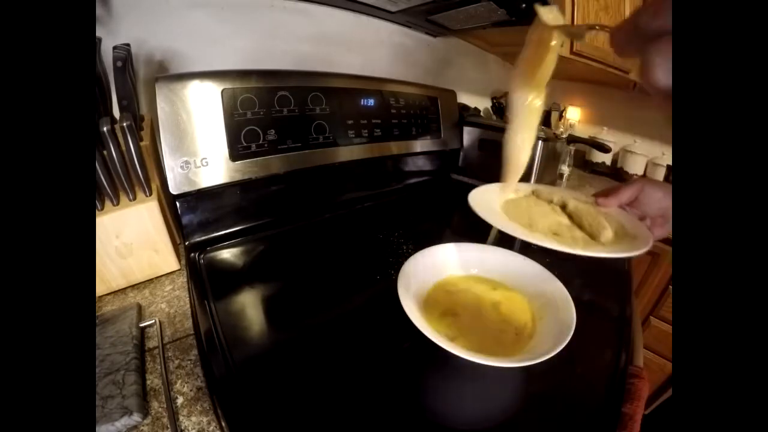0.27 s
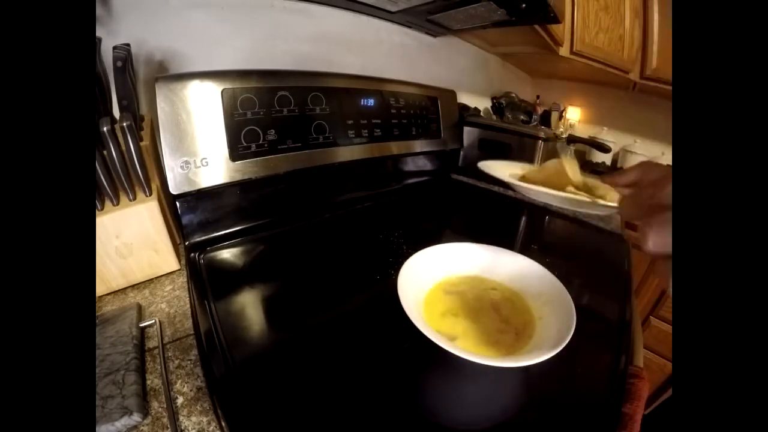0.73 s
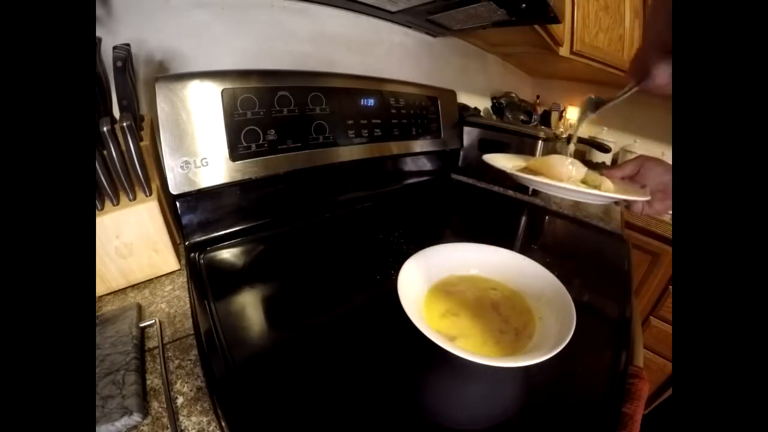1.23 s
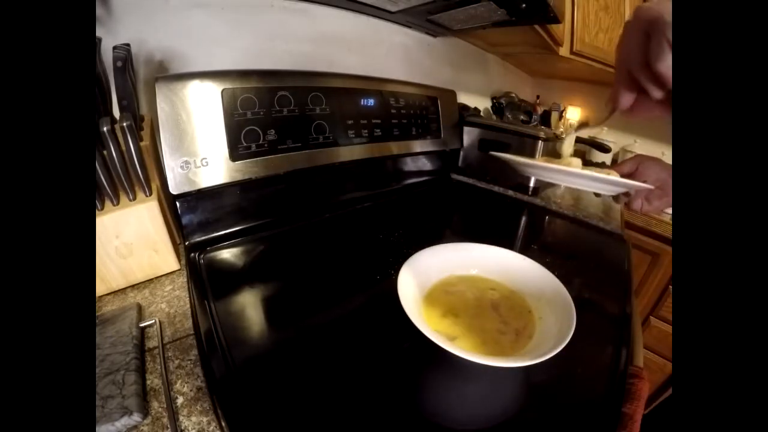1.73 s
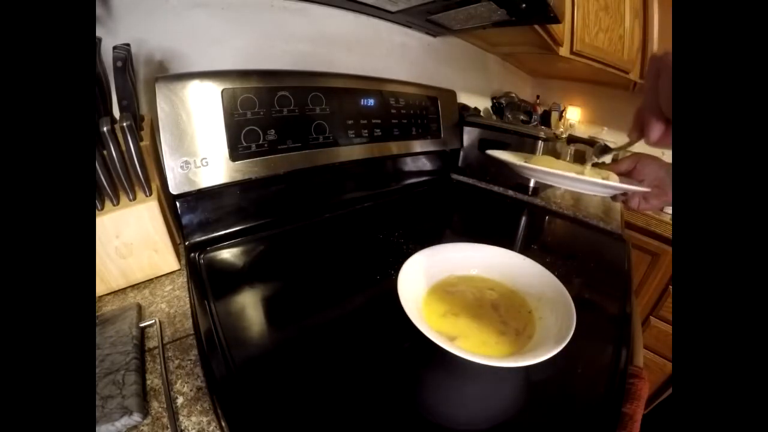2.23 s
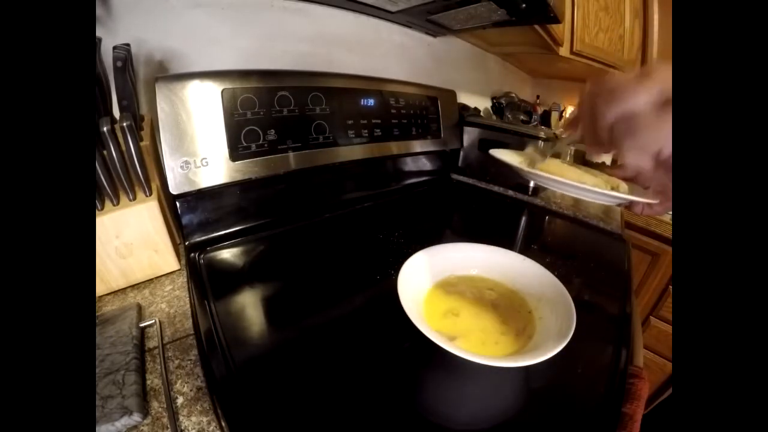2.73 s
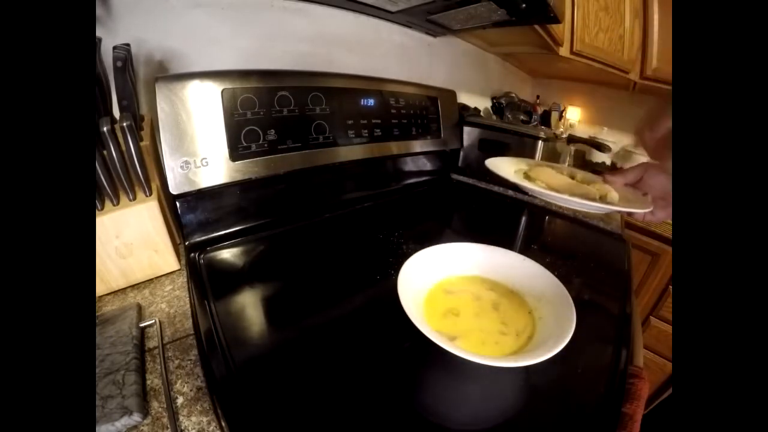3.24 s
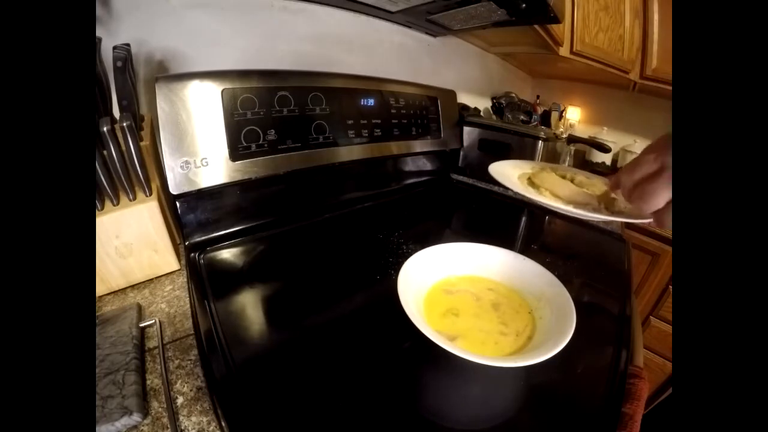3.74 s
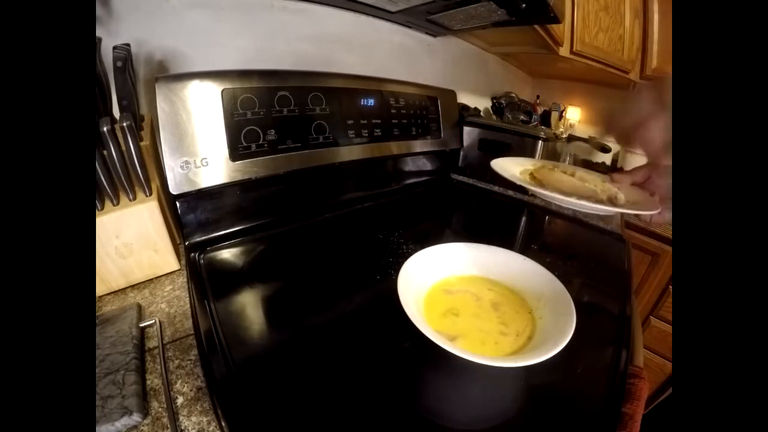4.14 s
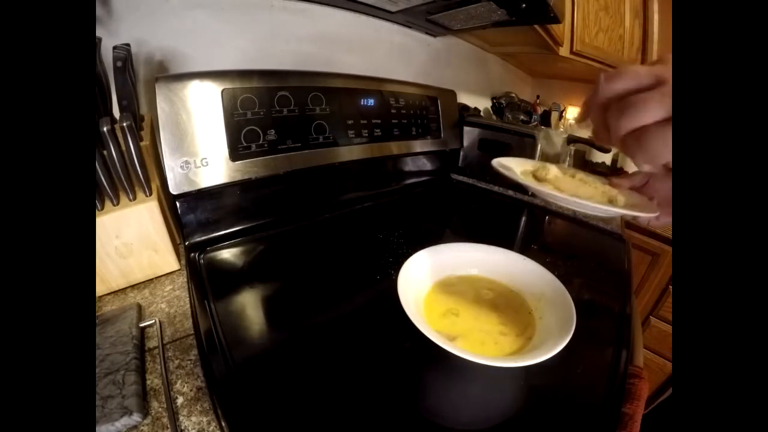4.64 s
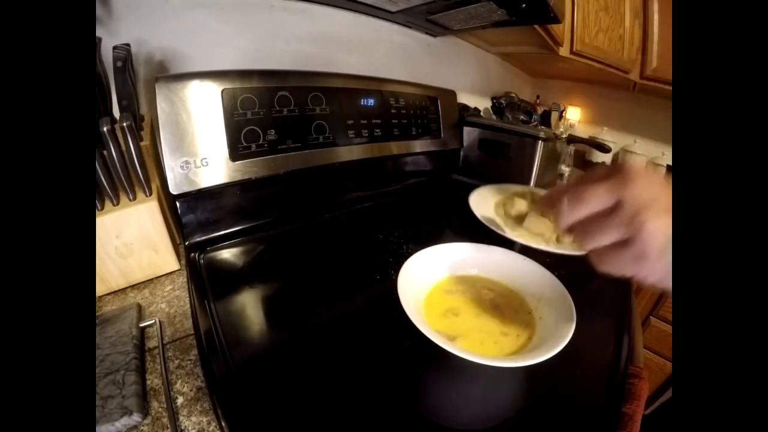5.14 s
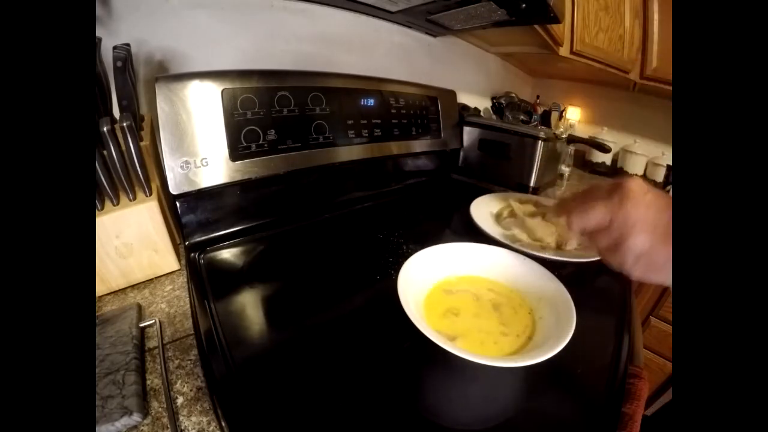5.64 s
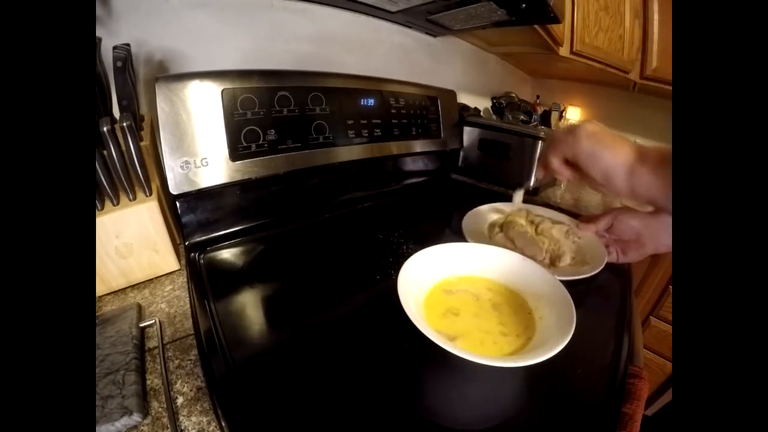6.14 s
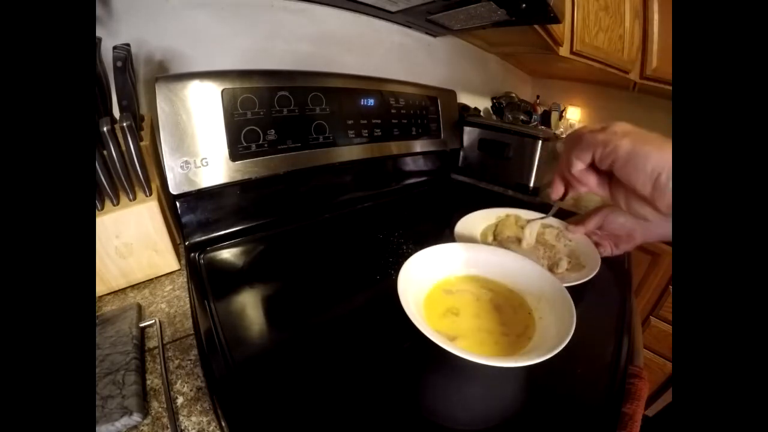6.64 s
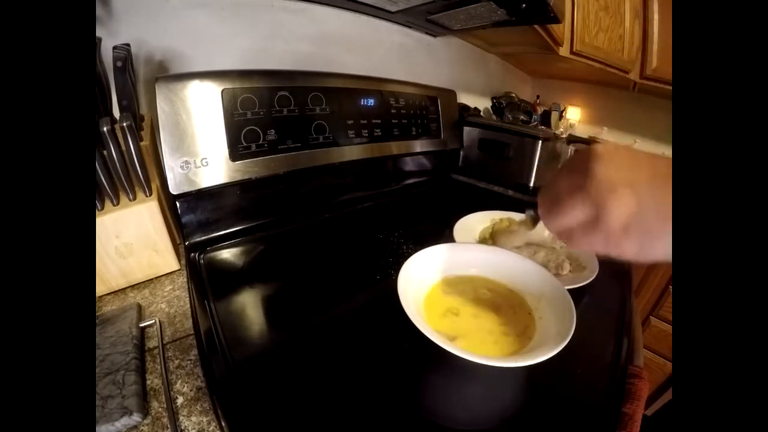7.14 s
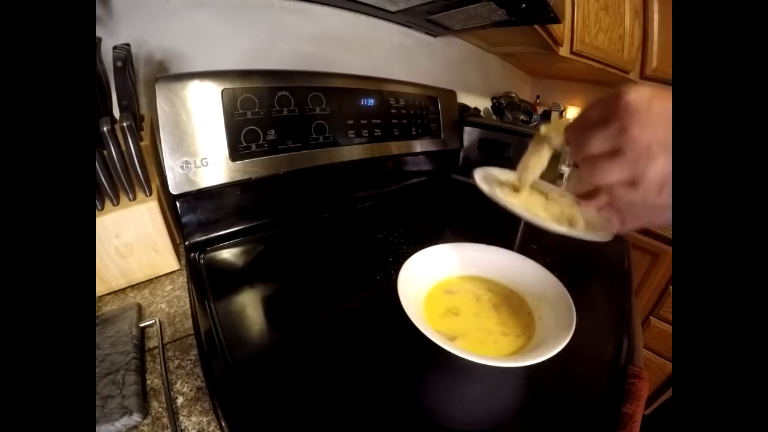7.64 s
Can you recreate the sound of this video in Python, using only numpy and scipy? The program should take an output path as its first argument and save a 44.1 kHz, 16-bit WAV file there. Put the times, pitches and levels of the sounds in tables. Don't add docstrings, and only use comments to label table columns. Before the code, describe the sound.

A steady low mains hum and faint airy hiss fill a small, hard-walled kitchen. At about 0.7 s a fork brushes a hand-held ceramic plate, then from 0.8 to 1.05 s a rapid bright cluster of clinks and scrapes, damped and short, trailing into a faint slide until 1.6 s. A single sharp, glinting tap comes at 2.0 s, with a small scrape at 2.2 s, and another hard clink at 2.8 s that rings slightly longer. Soft ticks and gritty slides run from 3.5 to 4 s, then near quiet. Light taps return at 5.2 to 5.7 s. At 6.5 s the plate slams onto the glass cooktop, a very loud close crash with a deep boom. It grinds and skids, then from 7.0 to 7.45 s is dragged with fast knocks, rumble and tiny high squeaks, fading into hum with faint scrapes near 7.7 s.

```python
import sys
import numpy as np
from scipy import signal
from scipy.fft import rfft, irfft, next_fast_len
from scipy.io import wavfile
from scipy.ndimage import uniform_filter1d

SR = 44100
rng = np.random.default_rng(int(sys.argv[2]) if len(sys.argv) > 2 else 0)


def master(y):
    cut = np.clip(np.atleast_2d(y).T, -1, 1)
    pcm = np.round(cut * 32767)
    wavfile.write(sys.argv[1], SR, pcm.astype(np.int16))


def gain_from_db(level_db):
    decades = np.asarray(level_db, float) / 20
    return 10 ** decades


N = 347949
T = np.arange(N) / SR

# (frequency [Hz], level [dB rms])
HUM_LINES = [(60.057, -35.7), (-120.1, -48.7), (240.2, -76), (540, -76), (720.6, -77), (785, -77),
             (1020.9, -74)]
# (frequency [Hz], density [dB per Hz])
AIR_COLOUR = [(20, -71.5), (40, -69.5), (90, -72.5), (150, -80), (300, -85.5), (550, -89.5), (1000, -94),
              (1400, -95.5), (2200, -98.5), (5000, -102), (9000, -103), (13000, -105), (14500, -103.5)]
# (frequency [Hz], side minus mid [dB])
AIR_WIDTH = [(60, -11), (110, -13), (200, -7.5), (380, -7.5), (700, -6.5), (1290, -5), (2380, -3),
             (4400, -0.5), (8120, 0), (15000, -0.5)]

# (frequency [Hz], level [dB], t60 [s])
PLATE_MODES = [(315, -12, 0.062), (549.4, -6.5, 0.07), (721.1, -4.5, .1), (931.5, -8.5, 0.07),
               (1141, -10, .04), (1386.6, -9, 0.028), (1583.3, -6, 0.04), (1849, -13.5, 0.038),
               (2134, -15, 0.027), (2408.3, -5, 0.051), (2581, -15, 0.077), (2797, -15.5, 0.046),
               (3348, -2, 0.066), (3590, -18.5, 0.025), (4398, -4.5, 0.048), (4780, -43.5, 0.054),
               (5278, -11.5, 0.05), (5474, -2.5, 0.045), (6063, -10, 0.032), (6543, -7, 0.04),
               (6973, -12, 0.049), (7350, -21, .05)]
# (frequency [Hz], level [dB], t60 [s])
RIM_MODES = [(1514, -21.5, 0.13), (1626, -25, .25), (2437.3, -19, 0.11), (2458.3, -21, 0.22),
             (3294, -18, 0.2), (3360, -17.5, 0.28), (4360, -27, 0.15), (4400, -24, 0.16),
             (5206, -23.5, .25), (5438, -21.5, 0.18)]
# (frequency [Hz], level [dB], t60 [s])
TINE_MODES = [(7790, -0.5, 0.1), (8055, 4, 0.045), (9170, -3, 0.067), (10000, -1.5, 0.033),
              (10720, 1.5, 0.04), (11430, 3.5, 0.032), (11900, -8, 0.037), (13504, -6, .05)]
GROUP_BORDERS_HZ = [1200, 2000, 3000, 3700, 4700, 7500]
GROUP_MIDDLES_HZ = [700, 1550, 2450, 3350, 4400, 6000, 9500]
GROUP_ANSWER_DB = [0.6, 0.29, -2.5, -0.67, -0.12]
# (time [s], level [dB], favoured pitch [octaves re 3 kHz], fall-off [dB per octave], tine glint [dB])
FORK_TAPS = [(0.6644, -60, -0.26, -10, 7.5), (0.8150, -28, 0.47, 3, 1), (0.850, -22, -.8, 14.5, -6),
             (0.8753, -18, 0.21, 4.5, -5.5), (0.8846, -13, -0.57, 6, -2), (0.9025, -11, 0.11, 9, -3.5),
             (0.9114, -19, -0.15, 18, 0.13), (0.947, -17, -.3, 14, -1), (1.0335, -26.5, 1.12, 16, 4.5),
             (1.0474, -29.5, .8, 21, 3.1), (1.9961, -12.5, 0.88, 16, 10.5), (2.797, -13, 0.168, -11.5, 6),
             (2.8017, -9, -.3, 12.5, -0.1), (3.4624, -43, 0.29, -9.5, 2.5), (3.5139, -45, 0.23, 12, 0.54),
             (3.552, -40, 0.13, 6.5, 0.14), (3.5964, -36, 0.29, 6.5, -0.04),
             (3.7222, -28, -0.63, 11.5, -1.6), (3.7541, -48, 0.24, -9.5, -0.35),
             (3.8023, -40, -0.66, 11, -0.4), (5.2435, -29, 0.19, 8.5, -0.2), (5.2544, -37, 0.21, 22, -0.2),
             (5.3741, -35, .16, 5, .1), (5.4174, -46, .45, 4.5, 1.1), (5.4461, -30.5, 0.23, 2.5, 8),
             (5.5397, -42, 0.33, -2, 1), (5.7046, -47, -0.38, 12, -0.9), (2.0003, -16.5, 0.77, 12, 8),
             (5.4403, -38, 0.52, 4, 4.5), (.894, -18.5, -0.83, 11, -2), (.964, -26, 0.39, 12, 0.97),
             (5.515, -47.5, -0.25, 7.5, 1), (5.717, -52.5, 0.56, 2.5, -0.82)]
# (time [s], frequency
# [Hz], level [dB], t60 [s])
SINGLE_MODES = [(.062, 850, -38.5, 0.0314), (1.17, 4800, -52.5, 0.092), (1.232, 4870, -46.5, 0.167),
                (1.1, 6770, -49, 0.233), (1.232, 8800, -50.5, 0.152), (1.232, 13200, -54, .1),
                (7.4, 6100, -47.5, .08), (2.798, 1545, -35, 0.55), (2.797, 1588, -12.5, .065),
                (2.797, 5455, -14, .07), (1.998, 700, -30.5, .09), (.903, 2400, -17, .09),
                (7.32, 190, -26, 0.38), (5.245, 1600, -36.5, .08), (3.6, 3800, -45.5, 0.087),
                (6.508, 560, -19, .08), (1.997, 4357, -13, .085), (.852, 1320, -28, .12),
                (.884, 1400, -22.5, 0.103), (.884, 1950, -26, .08), (.877, 3780, -24.5, 0.102),
                (.904, 3820, -22.5, 0.088), (.904, 4450, -19.5, 0.079), (5.245, 4350, -36, .06),
                (6.89, 180, -25, 0.166), (2.798, 2428, -33.5, .5), (3.463, 1320, -33.5, 0.058),
                (3.516, 720, -42, 0.126), (1.999, 3365, -31.5, 0.427), (1.998, 10700, -37, 0.054),
                (1.997, 6500, -21.5, .06), (2.797, 970, -19.5, .04), (2.8, 820, -37.5, 0.27),
                (5.376, 3350, -41, 0.121), (5.376, 1650, -42.5, .06), (7.39, 2430, -39, .15),
                (1.997, 1450, -31.5, .04), (1.998, 400, -36, 0.087), (.818, 720, -37, .15),
                (1.998, 7790, -36, 0.135), (5.446, 9100, -38, 0.042), (5.45, 4230, -44, 0.155),
                (5.47, 2520, -53.5, 0.54), (1.034, 6500, -29.5, 0.105), (2.223, 4180, -39, 0.0366),
                (3.33, 4950, -52, 0.044), (6.22, 3780, -47.5, 0.052),
                (1.997, 5449, -22, .08), (1.997, 3478, -19, 0.067), (1.998, 6180, -26.5, 0.077),
                  (1.998, 4165, -30, 0.061), (1.998, 3050, -23, 0.044), (1.999, 5565, -32.5, 0.19),
                  (1.999, 5770, -38, 0.27), (1.998, 1330, -33.5, 0.071), (2.797, 4380, -19.5, .14),
                  (2.797, 3386, -22, 0.114), (2.798, 5305, -21, .06), (2.815, 5474, -31, .36),
                  (2.815, 3370, -33, .3), (2.8, 2610, -30.5, 0.136), (2.8, 1400, -32, 0.246),
                  (2.8, 1338, -33, 0.145), (2.8, 7940, -38, 0.154), (2.8, 9708, -44, .12),
                  (2.8, 11490, -46, .12), (2.8, 600.3, -36, .2), (2.797, 6950, -21, .07),
                  (2.8, 7040, -36, .3), (2.8, 6110, -34, .22), (2.797, 2430, -18, .06),
                  (2.82, 1626, -35, .38), (1.998, 6640, -24, .06), (1.998, 6410, -24, .05),
                  (2.0, 6500, -40, .4), (5.447, 5300, -40, .1), (5.447, 6200, -42, .1),
                  (5.46, 5300, -54, .5), (.875, 5500, -28, .1), (.904, 5500, -28, .1),
                  (.875, 6650, -28, .12), (.885, 6200, -31, .06), (.946, 6700, -35, .08),
                  (.953, 5450, -35, .15), (.96, 4450, -34, .1), (.885, 750, -31, .15),
                  (5.447, 1594, -38, .1), (5.447, 2456, -38, 0.083), (5.447, 3914, -38, 0.062),
                  (5.253, 3360, -37, 0.06), (5.54, 4230, -45, .07), (5.418, 1687, -45.5, 0.068),
                  (5.418, 4470, -48.5, 0.084), (.665, 1561, -46, 0.188), (.89, 1693, -24.5, 0.068),
                  (.905, 1497, -24, 0.061), (.905, 3397, -22.5, 0.093)]
# (time [s], level [dB], hold [s], fade [s per 20 dB], low-mode ring [dB])
FORK_SCRAPES = [(0.664, -53.5, 0.0285, 0.21, -6.5), (0.858, -38, 0.017, 0.0874, -5),
                (.9, -29, 0, 0.0635, -8), (1.044, -41.5, 0, 0.0633, -24.5),
                (1.141, -60, 0.457, 0.02, -23.5), (1.899, -64, 0.072, 0.16, -11),
                (2.171, -55.5, 0.064, 0.0772, -13), (2.3, -70, 0.14, 0.28, -8),
                (3.501, -51.5, .04, 0.0435, -9), (3.6, -57, 0.141, 0.23, -8),
                (3.748, -55, .04, 0.0673, 3.5), (3.84, -58, 0.174, 0.02, -21),
                (4.42, -66.5, 0.338, 0.12, -10.5), (5.385, -46.5, 0.006, 0.0173, -12),
                (5.456, -41.5, 0, 0.0076, -11), (5.48, -55, 0.017, 0.2732, -4.5),
                (6.12, -69, 0.041, 0.4, -7), (6.222, -59.5, 0, 0.31, -12), (6.436, -60, 0.0051, .1, -9.5),
                (7.646, -55.5, 0.00077, 0.15, -11.5), (7.792, -54.5, 0.0016, 0.22, -6)]
# (frequency [Hz], level [dB])
GLAZE_COLOUR = [(1000, -43), (2500, 15.5), (4500, 21), (6200, 14), (7500, 2), (14000, -29)]

# (frequency [Hz], t60 [s])
ROOM_DECAY = [(200, 0.7), (1500, 0.47), (4000, 0.44), (8000, 0.4), (14000, 0.33)]

# (frequency [Hz], width [Hz], level [dB])
GLASS_MODES = [(87.7, 21, -1), (180.1, 18.6, 6.5), (313.9, 30, -3), (505, 35, -4), (600, 40, -3),
               (762.5, 70, -12), (890, 69, -6.5), (1103.6, 66, -8.5), (1320, 90, -12), (1749, 240, -9.5),
               (2140, 150, -4.5), (2435, 120, -5), (2800, 160, -9), (3374, 170, -13), (4600, 123, -24.5)]
# (frequency [Hz], level [dB])
GLASS_COLOUR = [(20, 7.5), (60, 3), (200, 5), (1000, -33.5), (3000, -11), (6000, -32), (9000, -65),
                (15000, -63)]
# (time [s], load [dB], brightness from speed [dB])
SETTLE_DRAG = [
    (6.25, -61, 1.47),
    (6.49, -57.5, 0.24),
    (6.56, -36, -0.16),
    (6.66, -32, 1),
    (6.755, -35.5, 3.5),
    (6.772, -45.5, 3.5),
    (6.89, -40, 6),
    (6.95, -50.5, -0.75),
    (7.02, -48, 0.8),
]
# (time [s], load [dB], brightness from speed [dB])
PULL_DRAG = [
    (7.09, -31, -.5),
    (7.23, -31, -3.5),
    (7.285, -40, -4),
    (7.33, -32, 2.5),
    (7.37, -32, 1.5),
    (7.45, -35, 4),
    (7.47, -43.5, -0.43),
    (7.53, -53, 0.12),
    (7.89, -59, -2),
]
# (time [s], level [dB], hardness [dB], favoured mode [Hz])
FOOT_KNOCKS = [(6.514, -7, 2, 873), (6.797, -38, 8.5, 543), (6.834, -40, 12, 3400),
               (6.845, -39.5, 7.5, 1058), (6.884, -29, 5, 2483), (7.037, -22, -1, 863),
               (7.048, -24.5, 3, 1097), (7.072, -20, 4, 614), (7.084, -13, .5, 1111),
               (7.1136, -11.5, 1, 538), (7.125, -22, -1.5, 547), (7.161, -17.5, 3, 871),
               (7.187, -14.5, -0.22, 505), (7.222, -14.5, 2.5, 905.7), (7.238, -23, -6, 313),
               (7.305, -30, 5.5, 2710), (7.314, -22, .1, 900), (7.326, -20, 0.03, 590),
               (7.415, -30, 3, 2434), (7.424, -34.5, 8, 3810), (6.6, -28, 2, 2697), (6.728, -39.5, 8, 2150),
               (6.752, -37, 5.5, 3300), (7.008, -41, -3, 580), (7.336, -23, 1, 1650),
               (7.445, -32.5, 6, 4090)]
# (frequency [Hz], level [dB], t60 [s])
BOOM_MODES = [(38, -17, 0.55), (88, -8, .22), (150.55, -14, 0.252), (183.6, -8, 0.149),
              (306.2, -10, 0.1217), (506.8, -15, .13), (610, -15, .1), (1129, -26, 0.25)]
# (frequency [Hz], density [dB per Hz])
SLAM_COLOUR = [(35, -34), (60, -3), (214, -9), (408, -25.5), (895, -11), (1240, -12), (1520, -8.5),
               (2260, -13.5), (3270, -14), (6380, -26), (15000, -39)]
# (band from [Hz], band to [Hz], t60 [s])
SLAM_DECAY = [(59.4, 290, 0.17), (295, 1080, 0.099), (1205, 5210, 0.0695), (3920, 7970, 0.0543),
              (7840, 13300, 0.0187)]
# (time [s], level [dB])
SQUEAKS = [
    (7.105, -39.5),
    (7.14, -53),
    (7.202, -43.5),
    (7.237, -44.5),
    (7.26, -48),
    (7.31, -48.5),
]

# (frequency [Hz], side minus mid [dB])
PORT_WIDTH = [(30, -8.5), (90, -17), (200, -23), (700, -27), (1500, -26), (3000, -17), (6000, -10),
              (10000, 0.5), (14000, -2)]
# (frequency [Hz], level [dB])
CREEP_COLOUR = [(6500, -34.5), (10000, -7.5), (14000, 0)]

CRACK_DB, CRACK_S, TINK_RISE_S = 1, 0.0052, .001
GRIP_S, GRIP_DB_PER_S = 3.5, 5
REACH_OCT, RIM_DB = 1.28, -10
CONTACT_MS, CONTACT_MS_PER_DB = 1.1, 0.0471
THUD_DB, GLINT_DB, ENDS_POWER = -19, -30, 0.698
STROKE_RISE_S, UPPER_RING_DB = 0.037, 1
ROOM_DB, ROOM_WIDTH, SWAY_S = -15.5, 0.1, .00007
KNOCK_T60_S, THUMP_DB, EDGE_DB, BOOM_DB = 0.0573, -2.5, -9, -3
NOTE_DB, NOTE_T60_S, JUDDER_DB = -2, 0.0524, 1.1
RUMBLE_DB, RUMBLE_POWER, DRAG_EDGE_DB, HISS_DB = -12, 0.599, -6, -27.5
SLAM_S, SLAM_DB = 6.5062, -1.5
SQUEAK_HZ, SQUEAK_FADE_S = 5154, 0.0205
TOP_HZ, FULL_SCALE = 15150, .93


def shape(x, points, turn=1):
    hz, db = np.transpose(points)
    size = next_fast_len(x.shape[-1])
    f = np.maximum(np.arange(size // 2 + 1) * SR / size, 1)
    gain = gain_from_db(np.interp(np.log(f), np.log(hz), db))
    return irfft(rfft(x, size) * turn * gain, size)[..., :x.shape[-1]]


def band_pass(x, lo_hz, hi_hz):
    return signal.sosfilt(signal.butter(2, [lo_hz, hi_hz], "band", fs=SR, output="sos"), x)


def band(x, lo_hz, hi_hz):
    y = band_pass(x, lo_hz, hi_hz)
    return y / np.std(y)


def ring(x, hz, width):
    return signal.lfilter(*signal.iirpeak(hz, hz / width, fs=SR), x)


def decay(t, t60):
    return 1000. ** (-t / t60)


def onset(t, rise_s):
    return 1 - np.exp(-t / rise_s)


def curve(rows):
    s, *columns = np.transpose(rows)
    times = np.r_[s[0] - .03, s, s[-1] + .03]
    return [gain_from_db(np.interp(T, times, np.r_[-120, c, -120])) for c in columns]


def stroke(s, db, hold_s, fade_s):
    t = T[::44]
    before = (s - t) / min(STROKE_RISE_S, fade_s)
    after = np.maximum(t - s - hold_s, 0) / fade_s
    return gain_from_db(db - 20 * np.maximum(before, after))


def grit(rate, spread_db):
    hit = rng.random(N) < rate / SR
    return hit * rng.choice([-1, 1], N) * gain_from_db(spread_db * rng.exponential(size=N))


def add(out, s, sound):
    i = int(s * SR)
    out[i:i + len(sound)] += sound[:N - i]


def background():
    hum = sum(np.sign(hz) * gain_from_db(db) * np.sqrt(2) * np.cos(2 * np.pi * hz * T) for hz, db in HUM_LINES)
    mid, side = shape(rng.standard_normal((2, N)), AIR_COLOUR) * np.sqrt(SR / 2)
    return hum, mid, shape(side, AIR_WIDTH)


def tap_groups(s, tap_db, octave, fall_db, tines_db):
    away = np.minimum(abs(np.log2(np.divide(GROUP_MIDDLES_HZ[1:-1], 3000)) - octave), REACH_OCT)
    ring_db = tap_db - fall_db * away
    ends_db = ENDS_POWER * ring_db.max() - .25 * abs(fall_db)
    thud_db = THUD_DB + ends_db - GRIP_DB_PER_S * max(s - GRIP_S, 0)
    return np.r_[thud_db, ring_db + GROUP_ANSWER_DB, GLINT_DB + ends_db + tines_db]


def taps():
    out, t = np.zeros(N), T[:SR // 4]
    hz, db, t60 = np.transpose(PLATE_MODES + RIM_MODES + TINE_MODES)[:, :, None]
    on_rim = np.repeat([0, 1, 0], [len(PLATE_MODES), len(RIM_MODES), len(TINE_MODES)])[:, None]
    wander = .008 * np.cumsum(rng.standard_normal((len(hz), len(t))), axis=1)
    fade = decay(t, t60)
    group = np.searchsorted(GROUP_BORDERS_HZ, hz)
    for tap in FORK_TAPS:
        s, tap_db = tap[:2]
        groups_db = tap_groups(*tap)
        spot, phase = rng.standard_normal((2, len(hz), 1))
        contact_s = max(CONTACT_MS - CONTACT_MS_PER_DB * tap_db, .2) / 1000
        strength = gain_from_db(db + groups_db[group] + RIM_DB * on_rim + 2.5 * spot)
        cycles = hz * t + phase + np.roll(wander, int(s * SR), axis=0)
        modes = strength * np.sin(2 * np.pi * cycles) * fade
        crack = gain_from_db(CRACK_DB) * shape(rng.standard_normal(len(t)), np.transpose([GROUP_MIDDLES_HZ, groups_db]))
        crack = crack * np.exp(-t / (CRACK_S + 2 * contact_s))
        add(out, s, (modes.sum(axis=0) + crack) * onset(t, contact_s))
    for (s, hz, db, t60), waver in zip(SINGLE_MODES, np.tile(wander, (3, 1))):
        tone = gain_from_db(db) * np.sin(2 * np.pi * (hz * t + waver))
        add(out, s, tone * decay(t, t60) * onset(t, TINK_RISE_S))
    return out


def room(x):
    t, (hz, t60) = T[:SR // 2], np.transpose(ROOM_DECAY)
    tail = np.zeros((2, len(t)))
    for lo in 110 * 2. ** np.arange(7):
        octave = band_pass(rng.standard_normal((2, len(t))), lo, 2 * lo)
        tail += octave * decay(t, np.interp(np.log(1.4 * lo), np.log(hz), t60))
    tail = tail * np.clip((t - .003) / 0.012, 0, 1)
    tail = tail / np.sqrt(np.sum(tail[0] ** 2))
    mid, side = signal.fftconvolve(x[None], tail, axes=1)[:, :N] * gain_from_db(ROOM_DB)
    sway = uniform_filter1d(uniform_filter1d(rng.standard_normal(N), size=500), size=500)
    return np.interp(T + SWAY_S * sway / np.std(sway), T, mid), ROOM_WIDTH * side


def scrapes():
    clicks = grit(9000, 1.8)
    body = sum(gain_from_db(db) * ring(clicks, hz, 3.3 / t60 + 12) for hz, db, t60 in PLATE_MODES)
    body = body / np.std(body) + gain_from_db(-3) * shape(clicks, GLAZE_COLOUR) / np.std(clicks)
    high = band(body, 900, 14000)
    low = band(ring(clicks, 1567, 71), 860, 2800)
    middle = band(ring(clicks, 2491, 110), 1800, 3000)
    gains = sum(stroke(*motion) * gain_from_db([[0], [ring_db]]) for *motion, ring_db in FORK_SCRAPES)
    level, rings = gains.repeat(44, axis=1)[:, :N]
    return level * high + rings * (low + gain_from_db(UPPER_RING_DB) * middle)


def boom(t, modes):
    return sum(gain_from_db(db) * np.sin(2 * np.pi * hz * t) * decay(t, t60) for hz, db, t60 in modes)


def dragged_dish(clicks):
    low = ring(ring(clicks, 1653, 543), 1653, 543)
    high = ring(ring(clicks, 4000, 1360), 4000, 1360)
    dish = low + gain_from_db(-13.5) * high
    return dish / np.std(dish)


def cooktop():
    clicks = grit(14000, 1.2)
    glass = gain_from_db(-3) * shape(clicks, GLASS_COLOUR)
    for k, (hz, width, db) in enumerate(GLASS_MODES):
        glass = glass + gain_from_db(db) * ring(np.roll(clicks, shift=997 * k), hz, 1.4 * width)
    layers = band(glass, 250, 1350), band(glass, 12, 310), band(glass, 1503, 5530), band(clicks, 2670, 7740)
    load, bright = curve(SETTLE_DRAG + PULL_DRAG)
    judder = uniform_filter1d(rng.standard_normal(N), size=350)
    load = load * gain_from_db(JUDDER_DB * judder / np.std(judder))
    push = np.array([load, gain_from_db(RUMBLE_DB) * load ** RUMBLE_POWER,
                     gain_from_db(DRAG_EDGE_DB) * load * bright, gain_from_db(HISS_DB) * load * bright ** 2])
    notes, t = np.zeros(N), T[:SR // 3]
    top_boom = boom(t, BOOM_MODES[1:]) * onset(t, .002)
    for s, knock_db, hard_db, hz in FOOT_KNOCKS:
        note_db = knock_db + NOTE_DB - 3 * np.log2(hz / 500)
        note = gain_from_db(note_db) * np.sin(2 * np.pi * hz * t)
        add(notes, s, note * decay(t, NOTE_T60_S) * onset(t, .001))
        add(notes, s, gain_from_db(knock_db + BOOM_DB - hard_db) * top_boom)
        level_db = knock_db, knock_db + THUMP_DB - 1.5 * hard_db, knock_db + EDGE_DB + hard_db
        for row, db, lasts, rise_s in zip(push, level_db, (1.1, 1.6, .7), (.0015, .004, .0012)):
            add(row, s, gain_from_db(db - 0.5) * decay(t, lasts * KNOCK_T60_S) * onset(t, rise_s))
    dish = gain_from_db(-12.5) * load * bright ** 2 * dragged_dish(clicks)
    return notes + (push * layers).sum(axis=0) + dish


def slam():
    out, t = np.zeros(N), T[:SR // 3]
    noise = shape(rng.standard_normal((len(SLAM_DECAY), len(t))), SLAM_COLOUR)
    crash = sum(band_pass(x, lo_hz, hi_hz) * decay(t, t60) for (lo_hz, hi_hz, t60), x in zip(SLAM_DECAY, noise))
    blow = crash / np.std(noise) + boom(t, BOOM_MODES)
    add(out, SLAM_S, gain_from_db(SLAM_DB) * blow * onset(t, 0.00024))
    return out


def squeaks():
    waver = uniform_filter1d(rng.standard_normal(N), size=200)
    tone = np.sin(2 * np.pi * np.cumsum(SQUEAK_HZ + 400 * waver) / SR)
    gain = sum(stroke(s, db, 0, SQUEAK_FADE_S) for s, db in SQUEAKS).repeat(44)[:N]
    return gain * tone / np.std(tone)


def scene():
    hum, air, air_side = background()
    plate = taps() + scrapes()
    glass = cooktop() + slam() + squeaks()
    wash, wash_side = room(plate + gain_from_db(-1) * glass)
    near = plate + glass + wash
    paths = rng.standard_normal(300) * np.exp(-np.arange(300) / 90)
    creep = shape(signal.lfilter(paths / np.linalg.norm(paths), 1, near), CREEP_COLOUR)
    hum_side = gain_from_db(-21.5) * shape(hum, [(1, 0.00018)], 1j)
    side = shape(near, PORT_WIDTH, -1j) + creep + hum_side + wash_side + air_side
    return near + hum + air + np.array([side, -side])


def low_pass(x):
    return signal.sosfilt(signal.butter(12, 16480, fs=SR, output="sos"), x)


def record(dry):
    soft = dry / (1 + np.abs(dry / FULL_SCALE) ** 6) ** (1 / 6)
    mix = signal.sosfilt(signal.ellip(8, .2, 40, TOP_HZ, fs=SR, output="sos"), soft)
    return low_pass(mix)


dry = scene()
out = record(dry)
master(out)
```